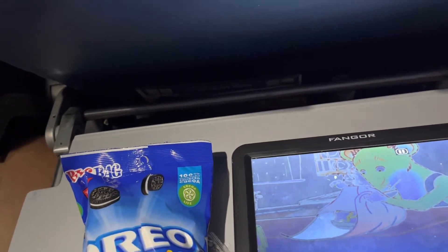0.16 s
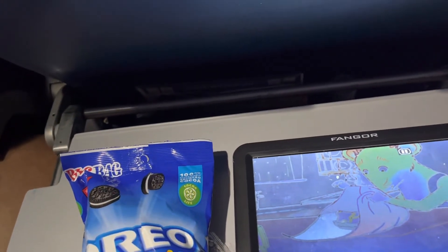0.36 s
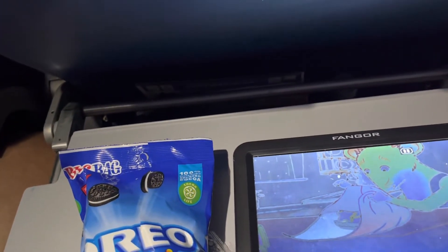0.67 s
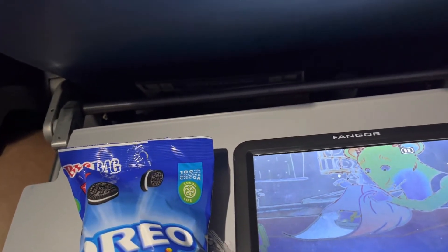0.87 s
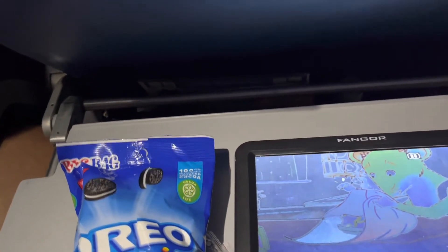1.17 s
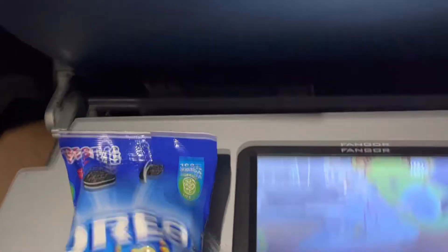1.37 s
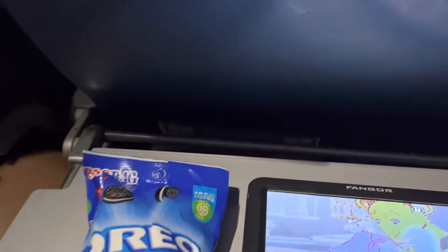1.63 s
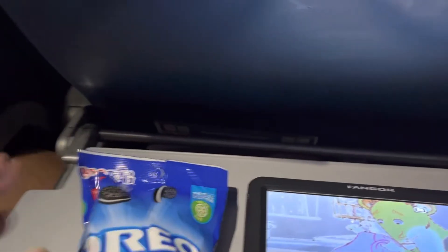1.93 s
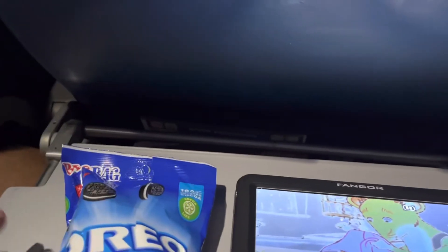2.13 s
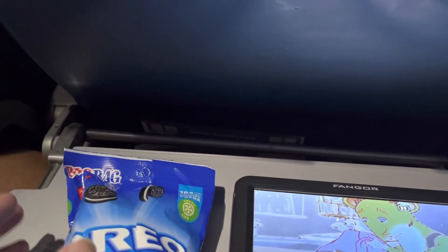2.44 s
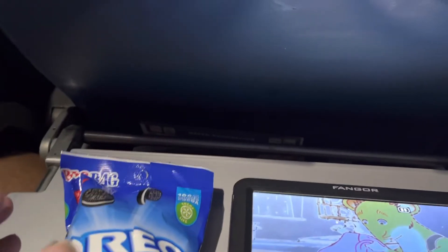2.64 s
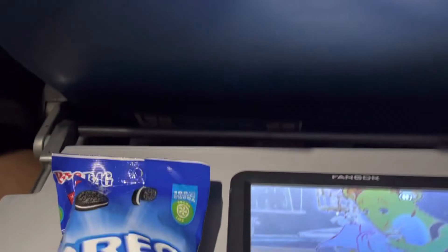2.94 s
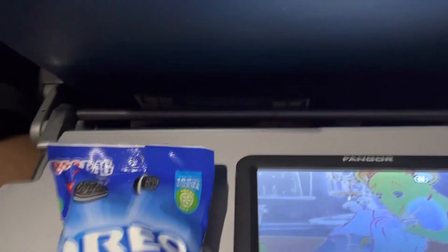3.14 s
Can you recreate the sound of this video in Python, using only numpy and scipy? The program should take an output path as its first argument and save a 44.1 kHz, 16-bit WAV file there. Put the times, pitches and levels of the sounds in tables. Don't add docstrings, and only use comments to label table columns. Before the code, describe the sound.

Deep constant aircraft cabin drone, while close by a snack bag lightly crackles and plastic is tapped

```python
import sys
import numpy as np
from scipy import signal
from scipy.fft import rfft, irfft, next_fast_len
from scipy.io import wavfile
from scipy.ndimage import uniform_filter1d, map_coordinates

SR = 44100
rng = np.random.default_rng(int(sys.argv[2]) if len(sys.argv) > 2 else 0)


def put_to_file(sound):
    columns = np.atleast_2d(sound).T
    safe = np.clip(columns, -1, 1)
    whole_steps = np.round(safe * 32767)
    wavfile.write(sys.argv[1], SR, whole_steps.astype(np.int16))


def ratio_of_db(decibels):
    return 10 ** (np.asarray(decibels, float) / 20)


N = 145530

# (frequency [Hz], density [dB per Hz])
RUMBLE_SPECTRUM = [(26, -33), (45, -5), (70, -4.5), (119, 0), (140, 2), (172, -7), (195, -6), (220, -12),
                   (290, -37), (480, -120)]
ROAR_SPECTRUM = [(130, -29), (220, 0), (269, -6.5), (333, -0.5), (388, -9), (425, -7.5), (505, -20.5),
                 (800, -28.5), (1040, -63), (1760, -120)]
AIRFLOW_SPECTRUM = [(470, -34), (800, -1.5), (998, -3.5), (1170, -2), (1330, -10), (1440, -6.5),
                    (1650, -11), (1900, -20.5), (2140, -19.5), (3000, -26), (3900, -57.5), (6600, -120)]
VENT_SPECTRUM = [(2300, -29), (3000, 1), (3600, 0.5), (4500, 0), (6300, -6.5), (8800, -6.5), (9150, -9.5),
                 (9400, -49.5)]
HISS_SPECTRUM = [(8900, -42.5), (9200, -2), (9600, 3.5), (10100, -5), (13000, -8.5), (14000, -7.5),
                 (15700, -17), (15900, -61)]
# (time [s], level [dB])
SHAFT_LEVEL = [(0.0, -22), (0.62, -32.5), (0.67, -22.5), (0.96, -23), (1.13, -17), (1.4, -33.5),
               (1.86, -34), (1.95, -25.5), (3.07, -31), (3.13, -44), (3.23, -29.5), (3.3, -22.5)]
# (frequency [Hz], left-right likeness [0-1], left phase lead [rad], left over right [dB])
STEREO_LOW = [(45, .995, -.1, -.4), (80, .985, -.18, -.8), (150, .95, -.32, -1.4), (400, .72, -.8, -1.6),
              (650, .1, -1.5, -1), (950, .3, -3.6, -1.5), (1120, .4, -5.9, -2.3), (1550, .3, -8.7, -2.4),
              (1800, .45, -12.2, 3), (2600, .45, -12, .5)]
STEREO_MID = [(3000, .4, .7, .7), (4500, .25, .6, 2.2), (6500, .4, -1, .4), (7100, .5, -2.4, .3),
              (7500, .9, -np.pi, 0), (8100, 1, -np.pi, 0), (8700, 1, -np.pi, 0), (9300, .4, -4.2, 0)]
STEREO_TOP = [(9300, .4, 2, 0), (10000, .5, .5, 0), (10700, .88, 0, 0), (11500, 1, 0, 0), (13000, 1, 0, 0),
              (13600, .4, -1, 0), (14200, .8, -np.pi, 0), (15000, .99, -np.pi, 0)]
# (frequency [Hz], level [dB])
FOIL_LOW = [(2200, -34), (2800, -9), (3800, -3.5), (5000, -4.5), (7000, -6), (7600, -4), (8600, -22),
            (9200, -39)]
FOIL_HIGH = [(7300, -40.5), (7800, -17.5), (9100, -6), (9600, 0.5), (13000, -2), (15500, -11), (15900, -63)]
# (start [s], length [s], low part [dB], bright part [dB])
RUSTLES = [(0.002, .028, -65, -72), (0.43, .022, -66, -70), (0.745, .016, -62, -63), (0.786, .02, -67, -70),
           (0.95, .022, -66, -68), (2.336, .007, -53, -61), (2.361, .014, -66, -66),
           (3.238, .013, -54, -62), (0.078, .13, -74, -70), (0.497, .035, -62, -59),
           (1.642, .11, -66.5, -78), (2.08, 0.16, -64, -67), (2.254, 0.044, -63.5, -65.5),
           (2.829, .1, -62, -71), (3.119, .07, -64, -68), (3.209, .03, -66, -69), (3.222, .014, -60, -64)]
# (time [s], lower partial [Hz], upper partial [Hz], level [dB])
SQUEAK = [
    (0.069, 7530, 8840, -87),
    (0.094, 7540, 9100, -68),
    (.15, 7230, 8760, -70.5),
    (.2, 7700, 8900, -67),
    (.22, 7900, 9000, -93),
]
# (time [s], peak [dB], pitch [Hz], bright part [dB], left over right [dB])
CRACKLES = [(0.0122, -45, 6350, -61, 1), (0.195, -58, 4600, -65.5, 2), (0.431, -53.5, 4600, -69.5, -3.5),
            (0.671, -59, 4590, -62, 3), (1.632, -55.5, 4640, -65, 3.5), (1.6525, -54.5, 5200, -70, 9.5),
            (1.661, -53.5, 5500, -69, 4.5), (1.667, -56.5, 5200, -72.5, 7.5), (1.698, -57, 5300, -70.5, 4),
            (1.707, -56.5, 5200, -69.5, 6), (1.761, -53.5, 4090, -74, 7.5), (1.804, -54, 5260, -74, 3),
            (1.93, -60.5, 4800, -62.5, 2.5), (2.272, -55, 4800, -62.5, 3), (2.325, -64, 4800, -62.5, 3.5),
            (3.157, -61, 4720, -64, -3), (0.1169, -66, 4600, -62.5, -4.5), (0.2703, -57.5, 4500, -64.5, -3),
            (0.4096, -51, 4500, -67.5, -6.5), (0.5025, -53.5, 4650, -56, -5),
            (0.5162, -55.5, 4540, -63, 2.5), (0.6275, -53, 4510, -62.5, -3), (0.75, -54, 4300, -59.5, 7.5),
            (0.7885, -51.5, 4690, -58, -2), (0.9614, -53, 4520, -58.5, 4), (1.647, -49, 4500, -68.5, 10.5),
            (1.6566, -52.5, 5400, -61.5, 17), (1.6872, -42.5, 4970, -59.5, 10),
            (1.7155, -47.5, 5200, -66.5, 6), (1.7265, -48, 5200, -69, 5), (2.0157, -52.5, 4360, -62, 3),
            (2.1816, -52.5, 4630, -66, -10), (2.2557, -52.5, 4600, -68.5, 4), (2.3379, -41, 4550, -54.5, 9),
            (2.3635, -53.5, 3950, -63.5, 2), (3.1325, -60, 5890, -64.5, -3),
            (3.1674, -58, 4370, -59.5, 8.5), (3.2099, -60, 4450, -55, 1.0), (3.2404, -51, 6030, -55, 0)]
# (frequency [Hz], level [dB], T60 [s])
SNAP_MODES = [(2600, -14, .012), (3550, -11, .014), (3950, -5, .015), (5150, 0, .015), (5420, -8, .013),
              (6400, -16, .014)]
# (time [s], peak [dB], pitch [Hz], T60 [s], upper mode [dB])
TAPS = [(0.326, -53.5, 2560, 0.11, -20), (0.4285, -38, 1170, 0.022, -12), (0.429, -30.5, 1480, 0.026, -28),
        (0.513, -53, 4650, 0.06, -20), (0.789, -56, 4700, 0.06, -20), (1.44, -62, 2600, 0.2, -20),
        (1.686, -44, 2400, 0.011, -12), (1.716, -48, 3000, 0.015, -20), (1.761, -41, 2230, 0.015, -16),
        (2.362, -26, 1600, 0.021, -16), (2.369, -41, 1700, 0.04, -6), (3.078, -25, 995, 0.016, -9),
        (3.079, -37, 1900, 0.011, -4), (3.185, -31, 1500, 0.022, -8), (3.24, -45, 2600, 0.015, -8)]
# (frequency [Hz], level [dB])
CLICK_COLOUR = [(500, -30), (800, 0), (1600, -4), (2600, -14), (4000, -60)]
# (start [s], length [s], level [dB])
LOW_RUSTLE = (3.08, .11, -61.5)
# (frequency [Hz], level [dB])
LOW_RUSTLE_COLOUR = [(1700, -22), (2300, 1), (3400, -2), (4200, -29)]

RUMBLE_DB, ROAR_DB, AIRFLOW_DB, VENT_DB, HISS_DB = -15.5, -22.5, -47.5, -65.5, -74
SHAFT_HZ, SHAFT_DRIFT_HZ, SHAFT_DB = 50.78, 0.8, 3
PORT_LAG_S = 0.00002
RUSTLE_GRAIN_DB, SQUEAK_BLUR_HZ, SQUEAK_DB = 3, 250, 10.5
CRACKLE_T60_S, CRACKLE_DB, CRACKLE_RISE_S = 0.013, 4.5, 0.00036
TICK_T60_S, TICK_DB, STRAY_DB = 0.009, 8.5, -7
RING_FROM_DB, RING_SPAN_DB = -60, 55
BLUR_HZ, BLUR_DB, PUFF_DB = 1300, -6, -12
SNAP_S, SNAP_RISE_S, SNAP_DB, SNAP_PAN_DB = 0.0112, 0.0009, -23.5, 1
TAP_DB, TAP_UPPER_RATIO, TAP_PAN_DB, TAP_RISE_S = 2.5, 1.348, -2, 0.0012
CLICK_DB, CLICK_T60_S = -9, 0.012
LOW_CUT_HZ, LOW_CUT_ORDER = 55.8, 1.9


def unit(x):
    return x / np.sqrt(np.mean(x ** 2) + 1e-20)


def along(points, hz):
    f, v = np.transpose(points)
    return np.interp(np.log(hz + 1), np.log(f + 1), v)


def wobble(rate_hz):
    knots = rng.standard_normal(int(N * rate_hz / SR) + 4)
    return map_coordinates(knots, [np.arange(N) * rate_hz / SR])


def filtered(x, response):
    m = next_fast_len(N + 8192)
    return irfft(rfft(x, m) * response(np.fft.rfftfreq(m, 1 / SR)), m)[..., :N]


def coloured_noise(colour):
    return unit(filtered(rng.standard_normal(N), lambda hz: ratio_of_db(along(colour, hz))))


def half_sine(start_s, length_s):
    return np.sin(np.pi * np.clip((np.arange(N) / SR - start_s) / length_s, 0, 1))


def ports(x, pan_db):
    return x * ratio_of_db(np.array([[pan_db / 2], [-pan_db / 2]]))


def lagged(pair):
    return filtered(pair, lambda hz: np.exp(np.outer([-1, 1], 1j * np.pi * hz * PORT_LAG_S)))


def spread(pair, table, spectrum):
    table_hz, likeness, lead_rad, lean_db = np.transpose(table)

    def mix(hz):
        angle = np.arccos(np.clip(np.interp(hz, table_hz, likeness), 0, 1)) / 2
        return np.array([np.cos(angle), np.sin(angle)])

    def balance(hz):
        level_db = along(spectrum, hz) + np.outer([.5, -.5], np.interp(hz, table_hz, lean_db))
        phase = np.outer([.5, -.5], 1j * np.interp(hz, table_hz, lead_rad))
        return ratio_of_db(level_db) * np.exp(phase)

    common, difference = filtered(pair, mix)
    return filtered(np.array([common + difference, common - difference]), balance)


def rush(spectrum, table, patchy_db, swell_db):
    z = signal.stft(rng.standard_normal((2, N)), nperseg=512)[2]
    field = uniform_filter1d(rng.standard_normal(z.shape[1:]), size=6, axis=0)
    field = uniform_filter1d(field, size=14, axis=1)
    pair = signal.istft(z * ratio_of_db(patchy_db * unit(field)), nperseg=512)[1][:, :N]
    swell = ratio_of_db(swell_db * (wobble(1.6) + wobble(7)))
    return unit(spread(pair, table, spectrum)) * swell


def cabin():
    hz = SHAFT_HZ + SHAFT_DRIFT_HZ * wobble(2.3)
    level_db = SHAFT_DB + np.interp(np.arange(N) / SR, *np.transpose(SHAFT_LEVEL))
    shaft = ratio_of_db(level_db) * np.sin(2 * np.pi * np.cumsum(hz) / SR)
    rumble = ratio_of_db(RUMBLE_DB) * rush(RUMBLE_SPECTRUM, STEREO_LOW, patchy_db=-0.9, swell_db=0.08)
    roar = ratio_of_db(ROAR_DB) * rush(ROAR_SPECTRUM, STEREO_LOW, patchy_db=1.75, swell_db=1.0)
    airflow = ratio_of_db(AIRFLOW_DB) * rush(AIRFLOW_SPECTRUM, STEREO_LOW, patchy_db=1.3, swell_db=0.15)
    vent = ratio_of_db(VENT_DB) * rush(VENT_SPECTRUM, STEREO_MID, patchy_db=1.8, swell_db=0.7)
    hiss = ratio_of_db(HISS_DB) * rush(HISS_SPECTRUM, STEREO_TOP, patchy_db=2.5, swell_db=-0.7)
    return shaft + rumble + roar + airflow + vent + hiss


def rustles():
    out = np.zeros((2, N))
    low = np.array([coloured_noise(FOIL_LOW), coloured_noise(FOIL_LOW)])
    high = np.array([coloured_noise(FOIL_HIGH), coloured_noise(FOIL_HIGH)])
    grain = unit(ratio_of_db(RUSTLE_GRAIN_DB * wobble(160)))
    for start_s, length_s, low_db, bright_db in RUSTLES:
        out += half_sine(start_s, length_s) * grain * (ratio_of_db(low_db) * low + ratio_of_db(bright_db) * high)
    return out


def squeak():
    time, out = np.arange(N) / SR, np.zeros((2, N))
    knot_s, lower_hz, upper_hz, db = np.transpose(SQUEAK)
    on = (time > knot_s[0]) & (time < knot_s[-1])
    level = on * ratio_of_db(np.interp(time, knot_s, db) + SQUEAK_DB)
    for hz in (lower_hz, upper_hz):
        pitch = np.interp(time, knot_s, hz) + SQUEAK_BLUR_HZ * np.array([wobble(640), wobble(420)])
        out += level * np.sin(2 * np.pi * np.cumsum(pitch, axis=1) / SR)
    return out


def bag():
    return spread(rustles() + squeak(), STEREO_MID + STEREO_TOP[1:], [(100, 0.0031)])


def hardest_snap():
    t = np.arange(SR // 10) / SR
    modes = sum(ratio_of_db(db - 60 * t / t60_s) * np.sin(2 * np.pi * hz * t) for hz, db, t60_s in SNAP_MODES)
    rise = (1 - np.exp(-t / SNAP_RISE_S)) ** 2
    return ports(ratio_of_db(SNAP_DB) * modes * rise, SNAP_PAN_DB)


def crackles():
    low = coloured_noise(FOIL_LOW)
    high = np.array([coloured_noise(FOIL_HIGH), coloured_noise(FOIL_HIGH)])
    rings, ticks = np.zeros((2, N)), np.zeros((2, N))
    blur = unit(wobble(BLUR_HZ)) + 1j * unit(wobble(BLUR_HZ))
    for start_s, db, hz, bright_db, pan_db in CRACKLES:
        i = round(start_s * SR)
        t = np.arange(min(SR // 10, N - i)) / SR
        span = slice(i, i + len(t))
        rise = 1 - np.exp(-t / CRACKLE_RISE_S)
        share = np.clip((db - RING_FROM_DB) / RING_SPAN_DB, 0, 1)
        scattered = ratio_of_db(BLUR_DB) * np.real(blur[span] * np.exp(2j * np.pi * hz * t))
        puff = ratio_of_db(PUFF_DB) * low[span]
        body = share * np.sin(2 * np.pi * hz * t) + (1 - share) * (scattered + puff)
        ring = rise * ratio_of_db(db + CRACKLE_DB - 60 * t / CRACKLE_T60_S) * body
        rings[:, span] += ports(ring, pan_db)
        ticks[:, span] += rise * ratio_of_db(bright_db + TICK_DB - 60 * t / TICK_T60_S) * high[:, span]
    snap = hardest_snap()
    rings[:, round(SNAP_S * SR):][:, :snap.shape[1]] += snap
    spread_ticks = spread(ticks, STEREO_MID + STEREO_TOP[1:], [(100, 0.0014)])
    return lagged(rings) + ratio_of_db(STRAY_DB) * ticks + spread_ticks


def taps():
    out, t = np.zeros((2, N + SR)), np.arange(SR // 8) / SR
    rise = (1 - np.exp(-t / TAP_RISE_S)) ** 2
    nail = coloured_noise(CLICK_COLOUR)
    for start_s, db, hz, t60_s, upper_db in TAPS:
        upper = ratio_of_db(upper_db) * np.sin(2 * np.pi * TAP_UPPER_RATIO * hz * t)
        modes = np.sin(2 * np.pi * hz * t) + upper
        knock = ratio_of_db(db + TAP_DB - 60 * t / t60_s) * modes
        noise = nail[round(start_s * SR / 2):][:len(t)]
        click = ratio_of_db(db + CLICK_DB - 60 * t / CLICK_T60_S) * noise
        out[:, round(start_s * SR):][:, :len(t)] += ports(rise * (knock + click), TAP_PAN_DB)
    return lagged(out[:, :N])


def low_rustle():
    start_s, length_s, db = LOW_RUSTLE
    grain = unit(ratio_of_db(3 * wobble(120)))
    return ratio_of_db(db) * half_sine(start_s, length_s) * grain * coloured_noise(LOW_RUSTLE_COLOUR)


def tray():
    return taps() + low_rustle()


def scene():
    return cabin() + bag() + crackles() + tray()


def band_limit(x):
    return signal.sosfilt(signal.butter(12, 15820, fs=SR, output="sos"), x)


def record(dry):
    mix = filtered(dry, lambda hz: (1 + (LOW_CUT_HZ / (hz + 1)) ** 8) ** (-LOW_CUT_ORDER / 8))
    return band_limit(mix)


dry = scene()
out = record(dry)
put_to_file(out)
```